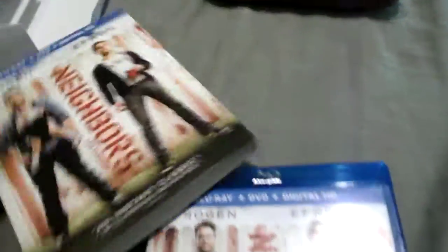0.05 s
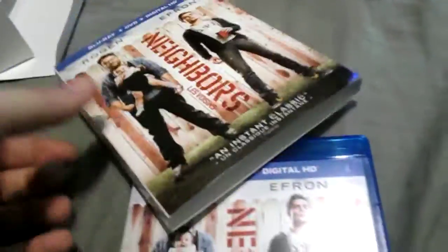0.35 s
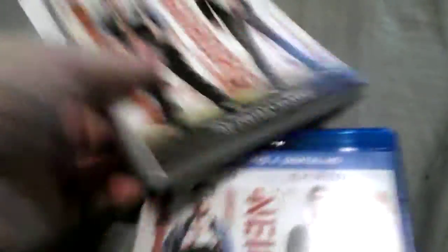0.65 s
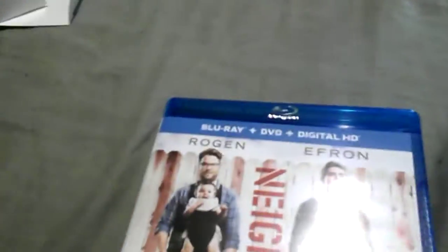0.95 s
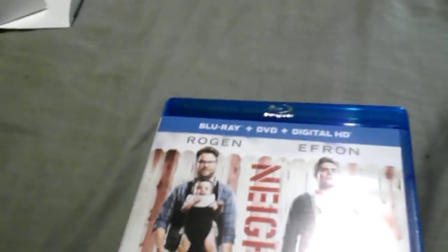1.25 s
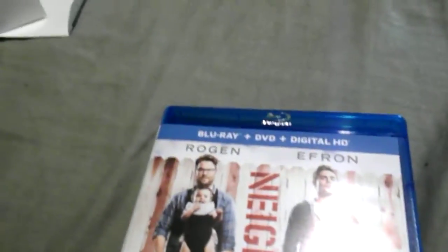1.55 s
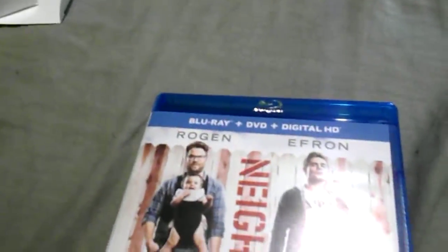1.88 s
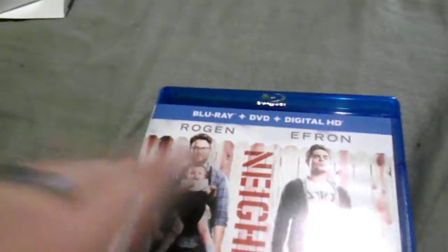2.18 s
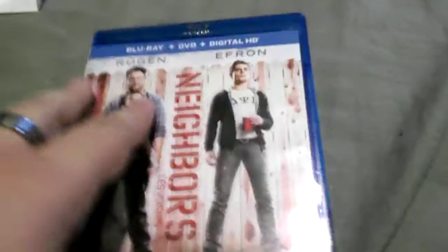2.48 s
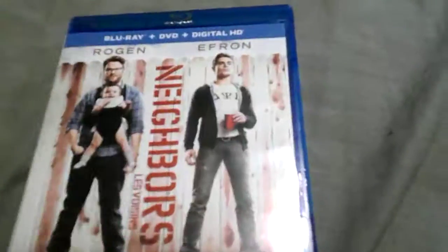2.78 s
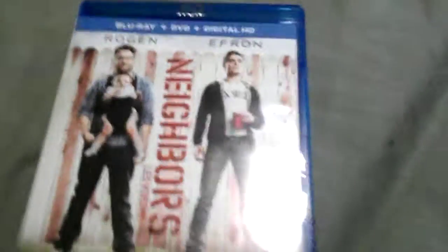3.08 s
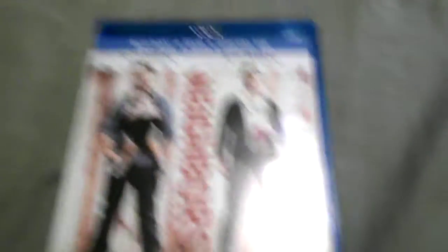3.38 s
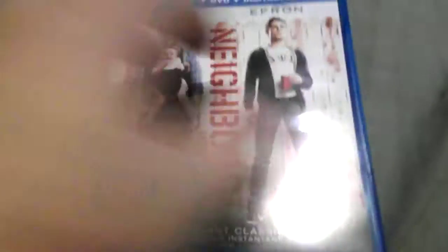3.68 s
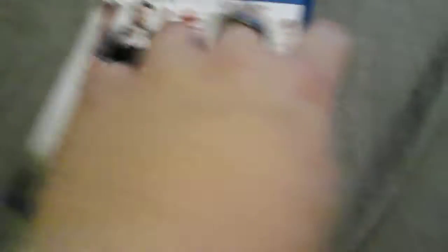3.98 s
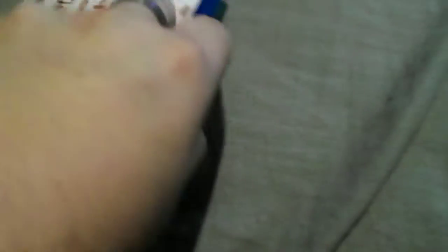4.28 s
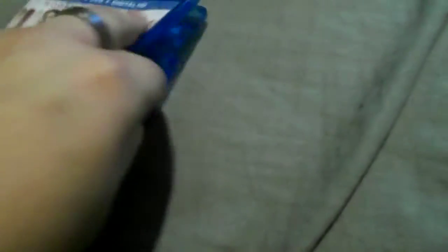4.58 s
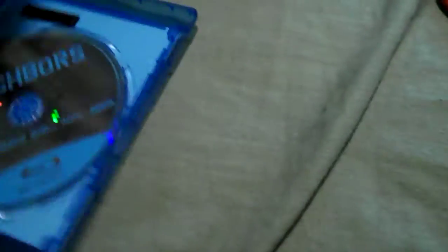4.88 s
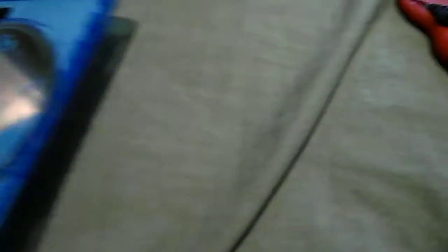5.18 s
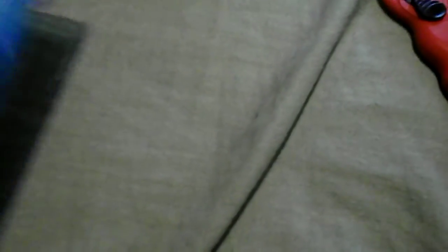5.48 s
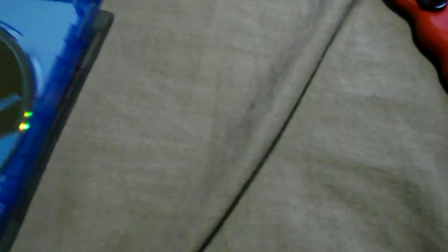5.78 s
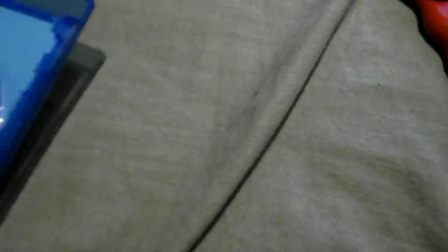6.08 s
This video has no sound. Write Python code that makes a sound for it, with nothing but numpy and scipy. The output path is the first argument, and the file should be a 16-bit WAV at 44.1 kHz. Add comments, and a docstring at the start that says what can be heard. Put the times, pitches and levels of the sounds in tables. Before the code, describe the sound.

A cardboard sleeve taps and thuds on a bed, then a plastic disc case slides over the sheet and snaps open, close up.

```python
"""First a cardboard slipcover is picked off a bed and put aside: its edges tick and the mattress thuds.
Then a hand slides a plastic disc case over the swishing sheet. Around three seconds in, fingers scrape
along the rim and the hollow shell flexes and rings. Near 4.7 seconds the catch snaps open and the lid
chatters; last, the lid is folded back and the cover film crinkles. All along, a small microphone sits
close by in a quiet, well damped room."""
import sys
import numpy as np
from scipy import signal
from scipy.fft import rfft, irfft
from scipy.io import wavfile
from scipy.ndimage import uniform_filter1d

SR = 44100
rng = np.random.default_rng(int(sys.argv[2]) if len(sys.argv) > 2 else 0)


def put_to_file(sound):
    """Save the sound as 16-bit audio at rate SR, in the file named by the first command-line argument."""
    columns = np.atleast_2d(sound).T  # one column per channel
    safe = np.clip(columns, -1, 1)
    whole_steps = np.round(safe * 32767)
    wavfile.write(sys.argv[1], SR, whole_steps.astype(np.int16))


N = 275272
TIME = np.arange(N) / SR


def shell_snaps():
    """The case flexes or its catch lets go: the shell cracks and rings, then its panels flutter."""
    # each snap: start_s, level_db, bass_db, treble_db
    snaps = [(2.553, -12.5, -19, -9), (2.6173, -22, 8.5, 2), (2.99, -13, 5.5, -2), (3.1193, -6.5, 10, -3),
             (3.1474, 7.5, -11, -12), (3.1915, -2, -4, -6), (3.388, -12, 3, -7), (4.3921, -6.5, 11, -4.5),
             (4.6652, 19, 3, 1.5), (4.6791, 17.5, 1.5, 2.5)]
    # the tones of the hollow shell: pitch_hz, ring_s, level_db
    shell_tones = [(249, 0.022, -1.5), (473, 0.01, -5), (730, 0.011, 3), (990, 0.014, 3.5),
                   (1867, 0.016, 6.5), (2250, 0.014, 5.5), (4050, 0.0042, -3.5), (5900, 0.013, -2),
                   (8800, 0.0041, -9)]
    crack_shape = [(60, -15.5), (160, -8), (1400, -16), (3000, -8), (5600, -6.5), (9000, -9.5),
                   (12000, -36)]
    out = np.zeros(N)
    for start_s, level_db, bass_db, treble_db in snaps:
        detune = 1 + 0.012 * rng.standard_normal(len(shell_tones))
        tones = sum((-1) ** k * gain(tone_db) * ring(pitch_hz * detune[k], ring_s)
                    for k, (pitch_hz, ring_s, tone_db) in enumerate(shell_tones))
        release = gain(-6.5) * burst(ring_s=0.025) + gain(-4) * burst(ring_s=0.0066)
        hit = tones + colour(release, crack_shape)
        flutter = signal.fftconvolve(hit, burst(ring_s=0.023))[:len(hit)]
        shape = [(900, bass_db), (1700, 0), (2400, 0.0061), (3400, treble_db), (7000, 1.14 * treble_db)]
        add(out, start_s, gain(level_db) * colour(hit + gain(-7) * flutter, shape))
    return out


def edge_taps():
    """A card or plastic edge touches down: it cracks, rings its panel and leaves a faint shiver."""
    # each tap: start_s, level_db, hollow_body_db, panel_db, sharp_edge_db, ring_s
    taps = [(0.029, 7.5, -4.5, 1, -3, 0.028), (0.0787, 4, -6, -4.5, -14, 0.026),
            (0.1167, 14.5, -15, -1, -20.5, 0.014), (0.1493, 2.5, -3, -4, -10, 0.022),
            (0.1824, -8.5, -3, 11.5, -41, 0.038), (0.217, 1.5, -37, -7.5, -11.5, 0.0054),
            (0.331, -19, 3, -1, 0, 0.0089), (0.351, -12.5, 6.5, 0, -19, 0.035),
            (0.4015, 13, -11, -8, -7.5, 0.022), (0.4436, -1, -6.5, -7, -8, 0.0084),
            (0.4641, -9.5, -2.5, -5, -12, 0.024), (0.6563, -5, -2.5, 2, -8, 0.022),
            (0.761, -15, 6.5, -2, -1, 0.06), (0.81, 4, -6.5, -3, -5.5, 0.015),
            (0.8238, 5, -9, -1, -9, 0.014), (0.9174, -12, -14, 0.5, -6, 0.031),
            (1.2025, -6.5, 2, 2.5, -16, 0.021), (1.226, -4, 1, 1, -13, 0.018),
            (1.3571, -20, 1.5, 4.5, -34, 0.032), (1.9968, -11.5, -5, -13, 2.5, 0.007),
            (2.043, -13, -17, -10, 0.5, 0.0066), (2.365, -11.5, 6.5, 1.5, -6, 0.014),
            (4.222, -23, -19, -29, 6, 0.0035), (4.6242, -14, 3.5, -18, -15, 0.032),
            (5.243, -14, -22, -26, -6, 0.01), (5.4386, -12, -10.5, -15, -10, 0.019),
            (5.5717, -10, -3, -7.5, -6, 0.023), (5.6916, -7.5, -4, -19, -21, 0.012),
            (5.7286, -11, -2.5, -10.5, -4, 0.008), (5.9715, -15, 1.5, -2, -8, 0.035),
            (6.1198, -6, 9.5, -8.5, -14, 0.016), (6.236, -7.5, -4.5, -7, -5, 0.029)]
    out = np.zeros(N)
    for start_s, level_db, body_db, panel_db, edge_db, ring_s in taps:
        panel, crack, shiver = burst(ring_s), burst(ring_s=0.0025), burst(ring_s=0.087)
        hit = panel + gain(-11.5) * (crack + shiver)
        shape = [(40, body_db - 5), (150, body_db), (1080, body_db), (1480, panel_db + 2),
                 (2500, panel_db), (3900, 0.015), (6200, 0), (8500, edge_db), (10200, edge_db - 3),
                 (12000, edge_db - 36)]
        add(out, start_s, gain(level_db) * colour(hit, shape))
    return out


def lid_chatter():
    """Freed from the catch, the lid chatters against the rim and settles."""
    # how strongly the lid chatters: time_s, level_db
    loudness = [(4.675, -90), (4.685, -29), (4.72, -27), (4.765, -29), (4.8, -35.5), (4.9, -49),
                (4.95, -90)]
    # the tone of the shivering lid: pitch_hz, level_db
    lid_shape = [(50, -13), (150, -7), (330, -5), (560, -9), (1050, 1.5), (1400, -2), (2000, 1.5),
                 (2800, -8), (3600, -10), (6000, -17), (11000, -38)]
    return colour(slips(per_second=2000, spread_db=0, ring_s=0.005) * gain_curve(loudness), lid_shape)


def rim_scrapes(grab_s=0.0027, growth_db=9, slip_off_s=0.0037, brush_rasp_db=-7.5):
    """Tiny slips of the fingers shake the hollow case: softly in a brush, ever harder in a scrape."""
    # fingers brushing the closed case: fastest_s, speed_up_s, slow_down_s, level_db
    brushes = [(3.11, 0.15, 0.16, -40), (3.31, 0.084, 0.065, -39), (3.49, .06, 0.083, -46.5),
               (3.8, 0.22, 0.53, -47.5)]
    # a fingertip catches on the rim, scrapes and slips off: start_s, length_s, final_db, rasp_db
    scrapes = [(2.99, 0.047, -29, 2), (3.391, 0.034, -32.5, -6), (3.43, 0.032, -18.5, 1)]
    # the tone of the closed case: pitch_hz, level_db
    case_shape = [(60, -9), (280, -4.5), (480, -12), (790, 0.5), (920, -0.5), (1140, 4.5), (1380, -5),
                  (1850, 4), (2300, 7.5), (2560, 1), (2850, -4.5), (3800, -7.5), (6000, -21), (11000, -40)]
    # the tone of the bright rasp on top: pitch_hz, level_db
    rasp_shape = [(500, -9), (2600, -2.5), (4500, -16), (6100, -6), (9400, -6), (10600, -9.5), (12000, -28)]
    case_push = sum(movement(*brush) for brush in brushes)
    rasp_push = case_push * gain(brush_rasp_db)
    for start_s, length_s, final_db, rasp_db in scrapes:
        age = TIME - start_s
        grip = np.clip(age / grab_s, 0, 1) * np.exp(-np.maximum(age - length_s, 0) / slip_off_s)
        force = grip * gain(final_db - growth_db * np.clip(1 - age / length_s, 0, 1))
        case_push = np.hypot(case_push, force)
        rasp_push = np.hypot(rasp_push, force * gain(rasp_db))
    judder = gain(1.8 * wander(300))
    body, rasp = (judder * slips(per_second=5000, spread_db=1.8, ring_s=0.003) for _ in range(2))
    return colour(body * case_push, case_shape) + colour(rasp * rasp_push, rasp_shape)


def edge_scuffs(release_s=0.00092, lead_s=0.06):
    """Friction grows while an edge is dragged, and stops as it comes free."""
    # each drag: free_s, level_db, build_up_s, treble_db
    scuffs = [(0.297, -21, 0.009, -16), (1.0279, -23.5, 0.0048, -13.5), (1.9007, -23, 0.0018, 5.5),
              (3.194, -30.5, 0.003, -7), (4.833, -25.5, 0.0036, 2.5), (5.161, -32.5, 0.0066, 4.5),
              (6.112, -28.5, 0.0056, -11)]
    out = np.zeros(N)
    age = TIME[:int(2 * lead_s * SR)] - lead_s  # zero when the edge comes free
    for free_s, level_db, build_up_s, treble_db in scuffs:
        grip = np.exp(np.minimum(age / build_up_s, -age / release_s))
        shape = [(150, -9), (1200, -16), (2300, -6.5), (3200, 2.5), (6000, -0.5), (9000, treble_db),
                 (12000, treble_db - 20)]
        add(out, free_s - lead_s, gain(level_db) * colour(grip * rng.standard_normal(len(age)), shape))
    return out


def plastic_rubs(band_fraction=0.097):
    """Fingers and card judder on plastic: for an instant the slips rasp around one pitch."""
    # each rub: middle_s, pitch_hz, half_length_s, level_db
    rubs = [(0.074, 730, 0.05, -24), (0.268, 815, 0.068, -29), (4.026, 1020, 0.024, -36),
            (4.091, 1780, 0.028, -34), (4.118, 990, 0.17, -40), (4.638, 5350, 0.031, -38),
            (4.64, 3550, 0.037, -39), (6.084, 930, 0.15, -36.5)]
    out = np.zeros(N)
    friction = slips(per_second=2000, spread_db=2.5, ring_s=0.003)
    for middle_s, pitch_hz, half_length_s, level_db in rubs:
        near = abs(TIME - middle_s) < half_length_s
        swell = np.cos(np.pi / 2 * (TIME[near] - middle_s) / half_length_s) ** 2
        ring_s = np.log(1000) / (np.pi * band_fraction * pitch_hz)  # a narrower band rings longer
        rasp = signal.fftconvolve(swell * friction[near], ring(pitch_hz, ring_s))
        add(out, middle_s - half_length_s, gain(level_db) * rasp)
    return out


def mattress_bumps(base_ring_s=0.044, doubling_db=12):
    """The mattress takes each landing as a dull thud; harder ones ring longer."""
    # each landing: start_s, pitch_hz, level_db
    bumps = [(0.03, 209, 25), (.056, 310, 17.5), (.184, 320, 11), (0.199, 208, 3), (.403, 153, 10),
             (0.416, 248, 10.5), (0.718, 152, -2), (.829, 125, 11), (1.205, 343, 6), (1.228, 230, 12.5),
             (2.51, 180, 4.5), (3.121, 266, 4), (4.24, 298, -0.5), (5.68, 171, 6.5), (6.121, 273, 2),
             (6.138, 109, 9)]
    out = np.zeros(N)
    for start_s, pitch_hz, level_db in bumps:
        ring_s = base_ring_s * 2 ** (level_db / doubling_db)
        shape = [(pitch_hz / 5, -26), (pitch_hz, -8), (pitch_hz * 2, -14), (pitch_hz * 8, -45)]
        padding = colour(burst(ring_s), shape)
        add(out, start_s, gain(level_db) * (ring(pitch_hz, ring_s) + padding))
    return out


def sheet_strokes(rest_db=-70.5, rest_wander_db=5):
    """A stroke is part smooth swish, part crackle of the catching weave; pressing adds dull bedding."""
    # hand, sleeve or case sliding over the sheet:
    # fastest_s, speed_up_s, slow_down_s, level_db, pressure_db, grit (0 to 1)
    strokes = [(.07, 0.19, 0.45, -51, 13.5, 0.07), (.39, 0.067, .13, -53, 12, 0.5),
               (.53, .1, 0.099, -61.5, 15.5, 0.7), (.71, 0.22, 0.085, -60, 10, 0.2),
               (.88, 0.19, 0.17, -52.5, 3, 0.6), (1.06, 0.058, 0.15, -57.5, 7, 0.04),
               (1.24, 0.086, 0.058, -54, 8, 0), (1.74, 0.14, 0.14, -67, 0, 0.5),
               (1.77, 0.039, 0.043, -51.5, -13, .25), (1.94, 0.17, .13, -44, 1.5, 0.83),
               (2.19, 0.097, 0.26, -50, -15, 0.22), (2.36, 0.086, 0.17, -46, 5.5, 0.46),
               (2.54, 0.25, 0.2, -56.5, 6.5, 0.05), (2.87, 0.3, 0.31, -53, 3.5, 0.06),
               (3.31, 0.45, 0.14, -56, 8.5, 0.03), (3.5, .1, 0.079, -66, -5, 0),
               (3.76, 0.16, 0.29, -46.5, -23, 0), (3.93, 0.079, 0.16, -53, 4, 0.14),
               (4.11, 0.15, .14, -63, 8, 0.2), (4.38, 0.22, 0.24, -50.5, -5, 0.04),
               (4.87, 0.44, 0.33, -50.5, 0, 0.33), (5.045, 0.038, 0.047, -48.5, 5.5, 1),
               (5.15, 0.087, 0.041, -49, 8, .9), (5.3, 0.25, 0.13, -57, 3, 0.7),
               (5.6, 0.11, 0.058, -55.5, 8.5, 0.7), (5.675, 0.056, 0.035, -45, 7.5, 0.5),
               (6.031, 0.047, 0.029, -47.5, 6, 0.76), (6.13, 0.1, 0.097, -43, 1.5, 0.6)]
    # the tone of the smooth swish: pitch_hz, level_db
    swish_shape = [(300, -19), (900, -5), (2000, 0), (3300, 6.5), (5500, 7), (6600, 5), (8500, -6),
                   (10300, -4), (12000, -39.5)]
    # the tone of the gritty rustle: pitch_hz, level_db
    rustle_shape = [(300, -13), (1000, -2), (2200, 0), (4000, 7.5), (5200, 12.5), (6500, 9.5), (8500, 7),
                    (10200, 4), (12000, -19.5)]
    # the tone of the padded bed under a pressing hand: pitch_hz, level_db
    bedding_shape = [(30, -20), (90, 2.5), (200, 5.5), (400, 3.5), (650, -3), (900, 0.5), (1900, -9.5),
                     (3200, -20), (7000, -28.5)]
    smooth, pressed = 0, 0
    gritty = gain(rest_db + rest_wander_db * wander(4.8)) ** 2  # a faint rustle stays between strokes
    for fastest_s, speed_up_s, slow_down_s, level_db, pressure_db, grit in strokes:
        power = movement(fastest_s, speed_up_s, slow_down_s, level_db) ** 2
        smooth += power * (1 - grit)
        gritty += power * grit
        pressed += power * gain(pressure_db) ** 2
    swish = colour(rng.standard_normal(N) * gain(0.7 * wander(60)), swish_shape) + skin_swish()
    weave = slips(per_second=2200, spread_db=2.5, ring_s=0.0045) * gain(2.3 * wander(110))
    padding = slips(per_second=2500, spread_db=0, ring_s=0.0072) * gain(1.2 * wander(40))
    rustle, bedding = colour(weave, rustle_shape), colour(padding, bedding_shape)
    return np.sqrt(smooth) * swish + np.sqrt(gritty) * rustle + np.sqrt(pressed) * bedding


def skin_swish(ring_s=0.0046, wander_db=3.5):
    """Skin on plastic hisses in narrow bands that come and go as the contact shifts."""
    # each band: pitch_hz, level_db
    bands = [(1250, -14.5), (2300, -1.5), (3400, 1.5), (4200, 2), (5000, -0.5), (6000, 6)]
    out = np.zeros(N)
    for pitch_hz, level_db in bands:
        level = gain(level_db + wander_db * wander(11))
        out += level * signal.fftconvolve(rng.standard_normal(N), ring(pitch_hz, ring_s))[:N]
    return out


def film_crinkles():
    """The thin film over the cover gives in separate, dry ticks, loudest once the case is open."""
    # how strongly the film ticks: time_s, level_db
    loudness = [(0, -57), (1.6, -72), (2, -55), (2.6, -59), (4.6, -80), (4.85, -50.5), (5.9, -58.5)]
    ticks = slips(per_second=38, spread_db=2, ring_s=0.007) * gain_curve(loudness)
    return colour(ticks, [(300, 6.5), (1500, -18), (3200, 4.5), (6000, 1), (9500, -10.5), (12000, -24)])


def room_echo(sound, ring_s, echo_db, delay_s=0.008):
    """The walls add a weak, slightly dull tail to the sound."""
    tail = colour(burst(ring_s), [(100, 1.5), (2000, -6.5), (6000, -9.5), (11000, -17)])
    late_tail = np.concatenate([np.zeros(int(delay_s * SR)), tail])
    return sound + gain(echo_db) * signal.fftconvolve(sound, late_tail)[:N]


def hiss_and_hum(hiss_db=-61, hum_hz=55.6):
    """Still room air, microphone hiss and a low hum that comes up at about two seconds."""
    # the tone of the air and hiss: pitch_hz, level_db
    hiss_shape = [(15, -79), (25, -29), (49, -38), (91, -15), (118, -4.5), (183, -12), (269, -6),
                  (314, -9.5), (410, -8.5), (700, -15.5), (1410, -20), (1520, -17.5), (1820, -21.5),
                  (7740, -29), (12000, -57), (15600, -85.5), (22000, -120)]
    # the level the hum wavers around: time_s, level_db
    hum_loudness = [(1.9, -76), (2.3, -66.5)]
    hiss = colour(rng.standard_normal(N), hiss_shape)
    hum = gain_curve(hum_loudness) * gain(2.2 * wander(6.3)) * np.sin(2 * np.pi * hum_hz * TIME)
    return hiss / hiss.std() * gain(hiss_db) + hum


def movement(fastest_s, speed_up_s, slow_down_s, level_db, speed_power=1.97):
    """The loudness of one slide: speed rises and falls in an arc, and friction noise follows it."""
    from_peak = np.maximum((fastest_s - TIME) / speed_up_s, (TIME - fastest_s) / slow_down_s)
    speed = np.sin(np.pi / 2 * (1 - np.clip(from_peak, 0, 1)))
    return gain(level_db) * speed ** speed_power


def slips(per_second, spread_db, ring_s):
    """Surfaces stick and let go in tiny random jumps, each ringing briefly; the overall level is 1."""
    strength = gain(spread_db * np.minimum(rng.exponential(size=N), 4))
    jumps = (rng.random(N) < per_second / SR) * strength * np.sign(rng.standard_normal(N))
    crackle = signal.fftconvolve(jumps, burst(ring_s))[:N]
    return crackle / crackle.std()


def burst(ring_s, size=8192, smoothing=200):
    """Many close panel tones at once: an even noise that fades by about 60 dB in ring_s."""
    fade = np.exp(-np.log(1000) * TIME[:size] / ring_s)
    spectrum = rfft(rng.standard_normal(size) * fade)
    even = irfft(spectrum / np.sqrt(uniform_filter1d(abs(spectrum) ** 2, smoothing)))
    return even * (np.arange(size) < size - smoothing)


def ring(pitch_hz, ring_s, size=8192):
    """One tone that fades by 60 dB in ring_s; as a filter it passes its own pitch at full level."""
    decay = np.log(1000) / ring_s
    return 2 * decay / SR * np.exp(-decay * TIME[:size]) * np.sin(2 * np.pi * pitch_hz * TIME[:size])


def wander(per_second):
    """A smooth random drift, mostly between -1 and 1."""
    hold = int(SR / per_second)
    steps = np.repeat(rng.standard_normal(N // hold + 1), hold)
    return 1.3 * uniform_filter1d(uniform_filter1d(steps, hold), hold)[:N]


def colour(sound, shape, size=2048):
    """Make each pitch range louder or softer, following (pitch_hz, level_db) points."""
    pitch_hz, level_db = np.transpose(shape)
    grid_hz = np.maximum(np.fft.rfftfreq(size, 1 / SR), 1)
    log_response = irfft(np.log(gain(np.interp(np.log(grid_hz), np.log(pitch_hz), level_db))))
    # fold the response forward in time, so nothing rings before the hit
    log_response[1:size // 2] *= 2
    log_response[size // 2 + 1:] = 0
    return signal.fftconvolve(sound, irfft(np.exp(rfft(log_response))))[:len(sound)]


def gain(level_db):
    """Turn decibels into a multiplier."""
    return 10 ** (np.asarray(level_db) / 20)


def gain_curve(points):
    """A multiplier that glides through (time_s, level_db) points."""
    return gain(np.interp(TIME, *np.transpose(points)))


def add(out, start_s, sound):
    """Mix a sound in at its start time."""
    i = max(0, int(start_s * SR))
    out[i:i + len(sound)] += sound[:max(0, N - i)]


def scene():
    """All the handling, close up, over the quiet room."""
    knocks = edge_taps() + shell_snaps() + lid_chatter() + mattress_bumps()
    friction = sheet_strokes() + film_crinkles() + rim_scrapes() + edge_scuffs() + plastic_rubs()
    return (room_echo(knocks + friction, ring_s=0.17, echo_db=-13.5) + hiss_and_hum())[None]


def record(dry, low_hz=55, dip_hz=7650, dip_width_hz=450, top_hz=11900):
    """The microphone thins the bass, has a narrow treble dip, rounds loud peaks and cuts the top."""
    thinned = signal.sosfilt(signal.butter(2, low_hz, "highpass", fs=SR, output="sos"), dry)
    dipped = signal.lfilter(*signal.iirnotch(dip_hz, dip_hz / dip_width_hz, fs=SR), thinned)
    rounded = np.tanh(1.2 * dipped) / 1.2
    return signal.sosfilt(signal.ellip(8, 0.2, 70, top_hz, fs=SR, output="sos"), rounded)


dry = scene()
out = record(dry)
put_to_file(out)
```